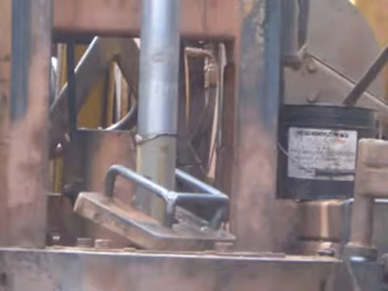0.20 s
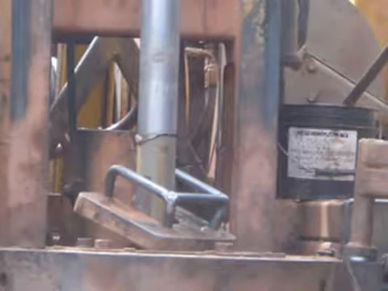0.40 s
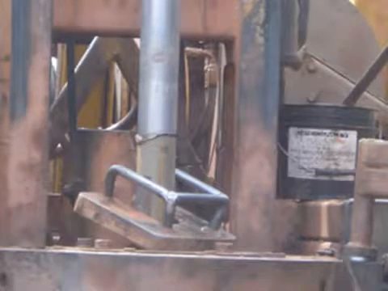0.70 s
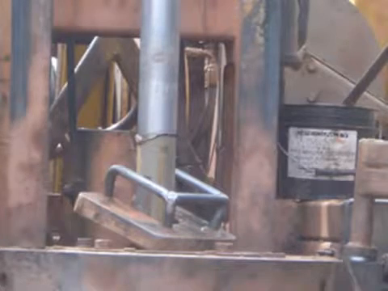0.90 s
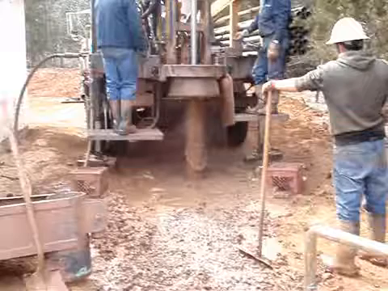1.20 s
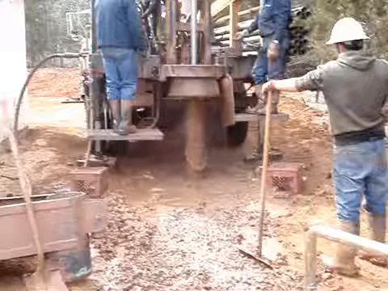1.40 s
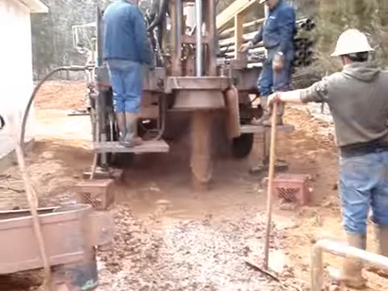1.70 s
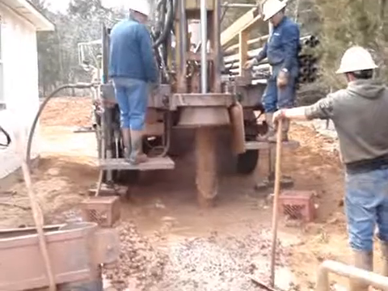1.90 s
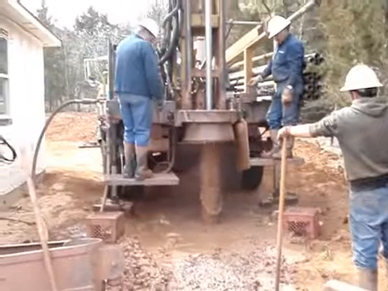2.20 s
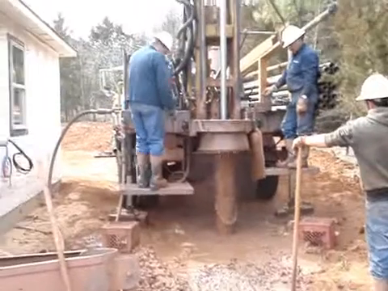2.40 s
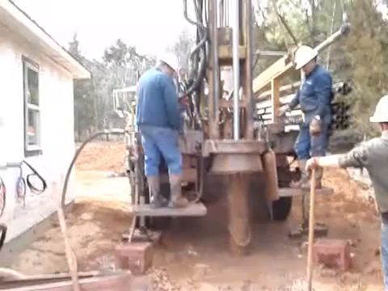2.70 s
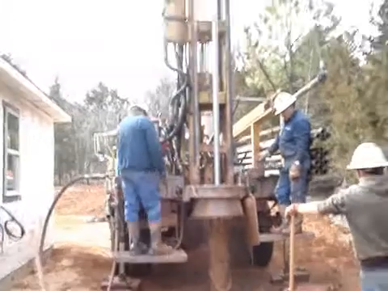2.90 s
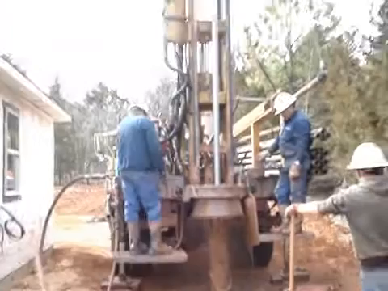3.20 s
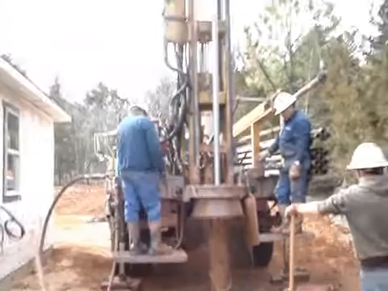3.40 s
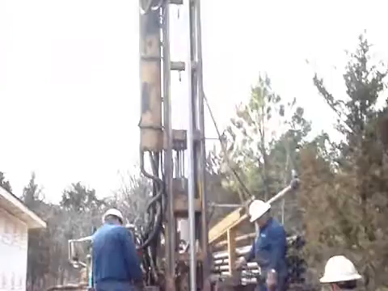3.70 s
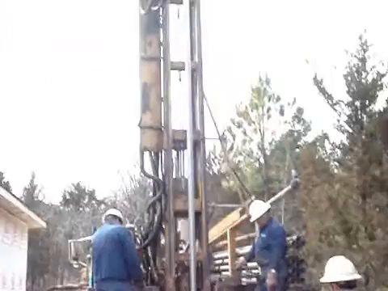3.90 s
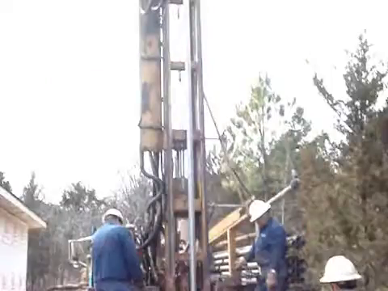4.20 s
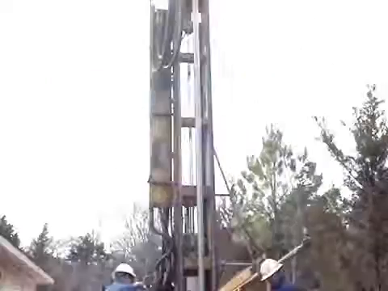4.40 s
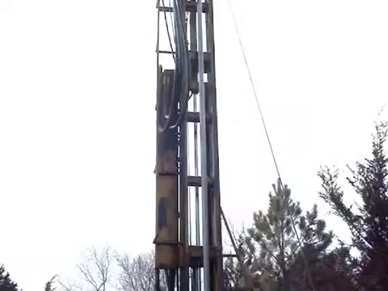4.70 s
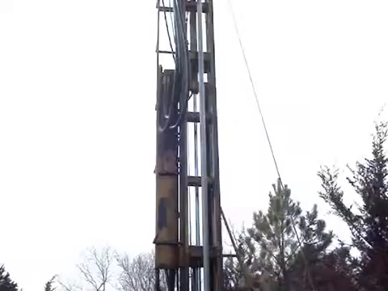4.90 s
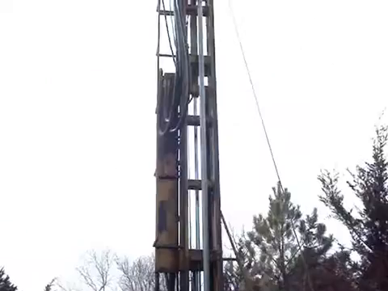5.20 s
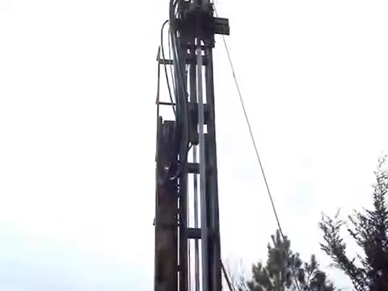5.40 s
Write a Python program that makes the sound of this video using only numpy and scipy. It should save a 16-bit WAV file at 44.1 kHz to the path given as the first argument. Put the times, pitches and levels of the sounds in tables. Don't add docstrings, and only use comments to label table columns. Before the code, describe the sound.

Faint electronic noise opens, followed by a hard cut to a big diesel drilling machine outdoors. Its buzzing engine tones, panel-ringing roar and steady air jet stay nearly constant, with tiny dips and surges. As the microphone swings up from the deck to the mast, low rumble thins and the tonal balance shifts. Mono, distorted, limited treble.

```python
import sys
import numpy as np
from scipy import signal
from scipy.fft import rfft, irfft
from scipy.io import wavfile
from scipy.ndimage import uniform_filter1d

SR = 44100
rng = np.random.default_rng(int(sys.argv[2]) if len(sys.argv) > 2 else 0)


def to_wav(s):
    ch = np.atleast_2d(s).T
    pcm = np.round(np.clip(ch, -1, 1) * 32767)
    wavfile.write(sys.argv[1], SR, pcm.astype(np.int16))


def boost(x):
    u = np.asarray(x, float) / 20
    return 10 ** u


N = 243873
T = np.arange(N) / SR
COARSE = T[::256]

# time_s, rate_cycles_per_s
ENGINE_SPEED = [
    (1.2, 16.664),
    (2.2, 16.7),
    (3.2, 16.728),
    (4.4, 16.788),
    (5.0, 16.808),
    (5.53, 16.821),
]
# multiple_of_cycle, level_aimed_low_db, level_aimed_high_db
ENGINE_ORDERS = [(5, -52.0, -55.0), (6, -53.0, -70.0), (7, -54.0, -56.0), (8, -47.0, -50.0),
                 (9, -35.0, -36.0), (11, -40.0, -47.0), (12, -43.0, -34.0), (13, -44.0, -50.0),
                 (14, -31.0, -36.0), (15, -37.0, -35.0), (16, -35.0, -37.0), (18, -31.0, -31.0),
                 (20, -40.0, -42.0), (21, -37.0, -45.0), (22, -37.0, -55.0), (24, -30.0, -33.0),
                 (26, -45.0, -41.0), (28, -39.0, -51.0), (30, -37.0, -38.0), (31, -35.0, -39.0),
                 (32, -28.0, -34.0), (35, -36.0, -54.0), (37, -51.0, -33.0), (38, -45.0, -37.0),
                 (42, -51.0, -38.0), (48, -35.0, -33.0)]
# multiple_of_cycle, level_aimed_low_db, level_aimed_high_db
DRIVEN_ORDERS = [(4.35, -57.0, -57.0), (36.15, -30.0, -30.0), (54, -47.0, -36.0), (55, -37.0, -46.0),
                 (56, -55.0, -40.0), (64, -44.0, -44.0), (66, -42.0, -39.0), (68, -56.0, -38.0),
                 (70, -34.0, -52.0), (71, -42.0, -46.0), (72, -44.0, -44.0), (75, -46.0, -41.0),
                 (80, -32.0, -41.0), (82, -40.0, -58.0), (83, -44.0, -54.0), (85, -59.0, -41.0),
                 (90, -51.0, -43.0), (93, -50.0, -41.0), (97, -43.0, -47.0), (104, -50.0, -44.0),
                 (111, -53.0, -35.0), (117, -58.0, -41.0), (120, -41.0, -40.0), (121, -52.0, -43.0),
                 (129, -54.0, -44.0), (130, -60.0, -42.0), (134, -56.0, -45.0)]


def rig():
    # time_s, half_length_s, roar_db, air_db
    lurches = [(1.19, .015, 3, 0.3), (1.373, 0.0086, -4, 1.5), (1.51, 0.13, 0.8, 1), (2.453, .15, 0.4, 0.6),
               (2.893, .06, -2, -1.3), (3.536, 0.021, -5, -1), (3.91, 0.023, 2, 3.5),
               (3.944, 0.029, -0.5, -2), (4.197, .08, 0.6, 1.5), (4.375, 0.018, -1.5, -1.8),
               (4.735, 0.06, 0.2, .8), (5.412, 0.064, -1, -1)]
    turns = cycles()
    roar_db, air_db = (np.interp(T, COARSE, db) for db in bumps(COARSE, lurches))
    drone = tones(ENGINE_ORDERS, turns, waver_db=1.0)
    drone += tones(DRIVEN_ORDERS, turns, waver_db=1.5)
    drone += whine(turns)
    machine = boost(0.29) * drone + roar(turns)
    return boost(roar_db) * machine + boost(air_db) * air(turns)


def cycles():
    return np.cumsum(np.interp(T, *np.transpose(ENGINE_SPEED))) / SR


def tones(rows, turns, waver_db):
    drift_turns = 0.08
    out, up = np.zeros(N), raised(COARSE)
    for multiple, low_db, high_db in rows:
        power = (1 - up) * boost(2 * low_db) + up * boost(2 * high_db)
        level = np.sqrt(power) * boost(waver_db * wander(6.0))
        slide = np.interp(T, COARSE, rng.random() + drift_turns * wander(0.99))
        out += np.sqrt(2) * np.interp(T, COARSE, level) * np.sin(2 * np.pi * (multiple * turns + slide))
    return out


def roar(turns):
    # frequency_hz, density_db_per_hz
    roar_colour = [(12, -55), (20, -33), (54, -27), (96, -16), (135, -14), (188, -8), (242, -2.5),
                   (455, -0.5), (516, -1.5), (610, 2.5), (1050, -3), (1350, -6.5), (3000, -16.5),
                   (3900, -38), (6600, -120)]
    flow = noise(roar_colour, patchy_db=1.14, flicker_db=0.28)
    flow = flow * throb(turns, cycle_depth=0.065, firing_depth=0.083)
    mixed = boost(-2.5) * flow + boost(-13.0) * clatter(turns)
    rumble_band = signal.butter(2, (70, 130), "band", fs=SR, output="sos")
    bass = signal.sosfiltfilt(rumble_band, mixed)
    up = raised(T)
    return (mixed - 0.5 * up ** 2 * bass) * boost(-17 + 0.5 * up)


def clatter(turns, count=2048):
    # frequency_hz, density_db_per_hz
    knock_early = [(60, -36.5), (250, -7.5), (600, 1.5), (1200, -5.5), (2000, -12), (3000, -27.5),
                   (5000, -54)]
    # frequency_hz, density_db_per_hz
    knock_late = [(60, -38), (250, -1.5), (600, 0.5), (1200, -4.5), (2000, -7), (3000, -20), (5000, -62)]
    hz = np.arange(count // 2 + 1) * ENGINE_SPEED[1][1]
    colour = boost(np.array([read(knock_early, hz), read(knock_late, hz)]))
    colour[:, [round(row[0]) for row in ENGINE_ORDERS + DRIVEN_ORDERS]] = 0
    shapes = evened(irfft(colour * np.exp(2j * np.pi * rng.random(colour.shape))))
    early, late = (np.interp(turns % 1 * count, np.arange(count), s, period=count) for s in shapes)
    angle = np.pi / 2 * raised(T)
    return np.cos(angle) * early + np.sin(angle) * late


def air(turns):
    # frequency_hz, density_db_per_hz
    air_colour = [(700, -33), (1200, -5), (2030, -6), (3800, -10), (5000, -12.5), (6700, -18.5),
                  (7250, -20.5), (8500, -23), (9300, -27), (9650, -27), (9800, -26), (10500, -24)]
    hiss = noise(air_colour, patchy_db=0.5, flicker_db=0.84)
    hiss = hiss * throb(turns, cycle_depth=0.04, firing_depth=0.03)
    return boost(-26 + 0.63 * raised(T)) * hiss


def whine(turns):
    # time_s, half_length_s, rise_db
    whine_beams = [
        (1.3, .4, 3.5),
        (4.2, .6, 7.5),
    ]
    level = boost(-53 + bumps(COARSE, whine_beams)[0] + 1.5 * wander(3))
    return np.sqrt(2) * np.interp(T, COARSE, level) * np.sin(2 * np.pi * 288.06 * turns)


def throb(turns, cycle_depth, firing_depth):
    cycle = np.cos(2 * np.pi * turns)
    firing = np.cos(2 * np.pi * 6 * turns)
    return 1 + cycle_depth * cycle + firing_depth * firing


def noise(points, patchy_db, flicker_db):
    # frequency_hz, width_hz, gain_db
    panels = [(510, 47, 0), (801, 60, 4.5), (947, 27, 2), (1200, 60, 3.5), (1608, 70, 4), (2363, 230, 2.5),
              (6730, 710, 3.5)]
    frames, hz = N // 256 + 5, np.fft.rfftfreq(1024, 1 / SR)
    a, b, patches = rng.standard_normal((frames, 513, 3)).T
    patches = uniform_filter1d(patches, size=14, axis=0)
    patches = evened(uniform_filter1d(patches, size=14, axis=1))
    flicker = evened(uniform_filter1d(rng.standard_normal(frames), size=5))
    rings_db = sum(db / (1 + (2 * (hz - f) / width) ** 2) for f, width, db in panels)
    colour_db = read(points, hz) + rings_db
    z = (a + 1j * b) * boost(colour_db[:, None] + patchy_db * patches + flicker_db * flicker)
    return evened(signal.istft(z, nperseg=1024, noverlap=768)[1][:N])


def idle():
    # frequency_hz, density_db_per_hz
    idle_colour = [(5.9, -27), (10, -5), (65, -9), (87, -15), (194, -22), (218, -20), (245, -22),
                   (317, -24.5), (775, -30), (2750, -29.5), (7550, -33), (9780, -36.5), (12700, -54),
                   (21500, -120)]
    hz = np.fft.rfftfreq(N, 1 / SR)
    hiss = evened(irfft(rfft(rng.standard_normal(N)) * boost(read(idle_colour, hz)), N))
    hum_db = -73 + 2.5 * np.interp(T, COARSE, wander(6.3))
    hum = boost(hum_db) * np.sqrt(2) * np.sin(2 * np.pi * 60 * T)
    hiss_db = -62.5 + 0.35 * np.interp(T, COARSE, wander(5.0))
    return boost(hiss_db) * hiss + hum


def raised(s):
    start_s, end_s = 1.6, 5.1
    return np.clip((s - start_s) / (end_s - start_s), 0, 1)


def bumps(s, rows):
    at, half, *heights = np.transpose(rows)
    return np.array(heights) @ np.exp(-((s - at[:, None]) / half[:, None]) ** 2)


def wander(top_hz, count=24):
    hz = np.geomspace(top_hz / 8, top_hz, count)
    return evened(np.sin(2 * np.pi * (np.outer(COARSE, hz) + rng.random(count))).sum(1))


def read(points, hz):
    f, value = np.transpose(points)
    return np.interp(np.log(hz + 1), np.log(f + 1), value)


def evened(x):
    return x / np.sqrt(np.mean(x ** 2) + 1e-20)


def scene():
    return rig()[None]


def overload(x):
    soft = 0.72 * np.tanh(x / 0.72)
    lean = soft ** 2 - uniform_filter1d(soft ** 2, size=400)
    return soft - 0.11 * lean


def coarse_rounding(x, follow, stingy_db):
    # frequency_hz, step_db
    step_points = [(90, -21), (100, -14.5), (205, -14.5), (220, -10.5), (1600, -10.5), (2400, -13),
                   (4100, -18), (5500, -18.5), (7000, -20.5), (8500, -23.3), (9600, -23.6), (9800, -27.2)]
    # time_s, half_length_s, step_change_db
    spending = [(1.19, .09, -6), (2.15, .05, -2.3), (2.7, .05, -1.5), (2.85, .05, -1.5), (3.35, .04, -1.2),
                (3.68, .05, -1.9), (4.3, .04, -1.5), (4.5, .04, -1.5), (4.8, .05, -1.2), (5.3, .06, -1.2)]
    hop, first, bins = 2048, 256, np.arange(925)
    n = np.arange(2 * hop) + 0.5
    window = np.sin(np.pi * n / (2 * hop))
    basis = window * np.cos(np.pi / hop * np.outer(bins + 0.5, n + hop / 2)) * np.sqrt(2 / hop)
    lead = 2 * hop - first
    padded = np.pad(x, (lead, 3 * hop), "reflect")
    at = np.arange(0, len(padded) - 2 * hop, hop)[:, None] + np.arange(2 * hop)
    terms = padded[at] @ basis.T
    treble = np.sqrt(np.mean(terms[:, len(bins) // 3:] ** 2, 1, keepdims=True))
    s = (at[:, hop] - lead) / SR
    thrift_db = bumps(s, spending)[0] + (s / T[-1] - 0.5)
    chance = boost(thrift_db[:, None] + stingy_db * rng.standard_normal(treble.shape))
    step = boost(read(step_points, bins * SR / (2 * hop))) * (treble / np.median(treble)) ** follow * chance
    kept = np.round(terms / step) * step
    return np.bincount(at.ravel(), (kept @ basis).ravel(), len(padded))[lead:][:N]


def top_cut(x):
    return signal.sosfilt(signal.butter(12, 11900, fs=SR, output="sos"), x)


def record(dry):
    rounded = coarse_rounding(overload(dry[0]), follow=0.85, stingy_db=0.3)
    cut_in_s, slope_s = 1.1848, 0.0009
    gate = 1 / (1 + np.exp(-np.clip((T - cut_in_s) / slope_s, -40, 40)))
    mix = gate * rounded + (1 - gate) * idle()
    return top_cut(mix[None])


dry = scene()
out = record(dry)
to_wav(out)
```